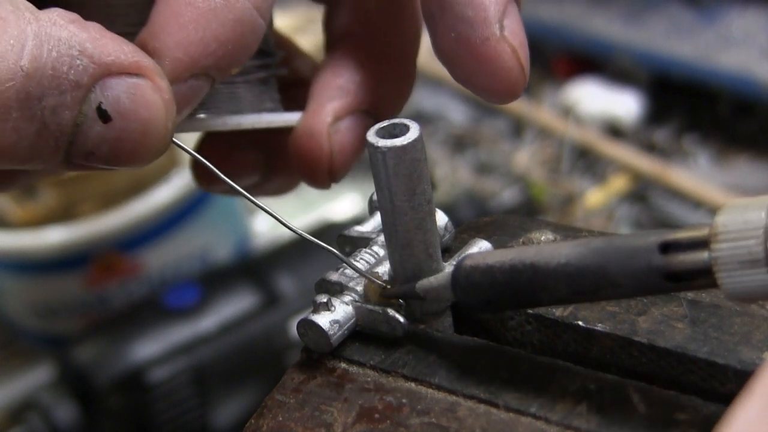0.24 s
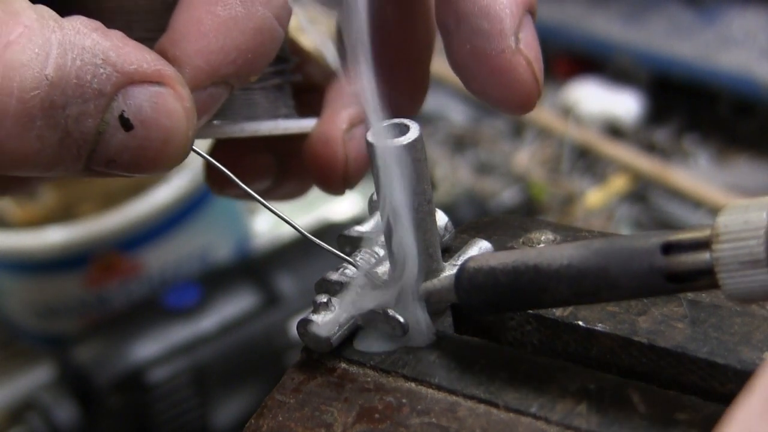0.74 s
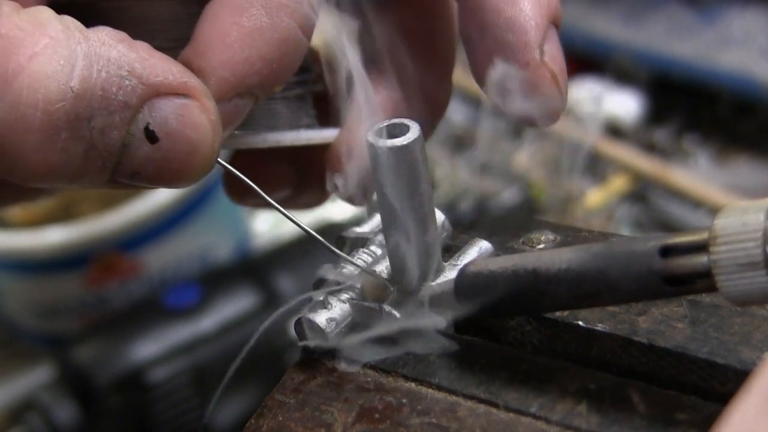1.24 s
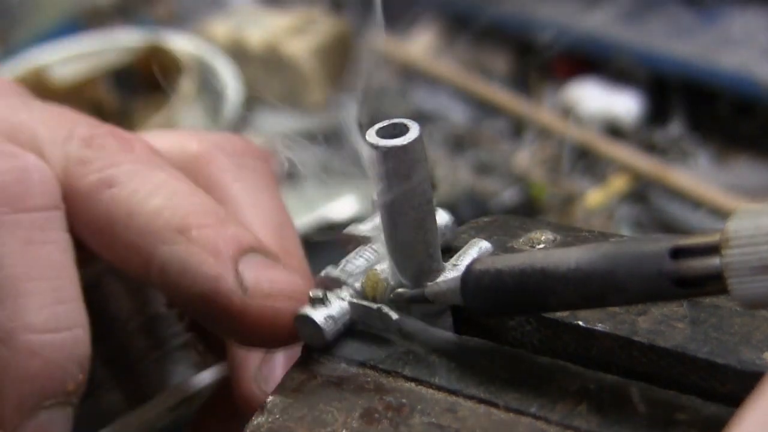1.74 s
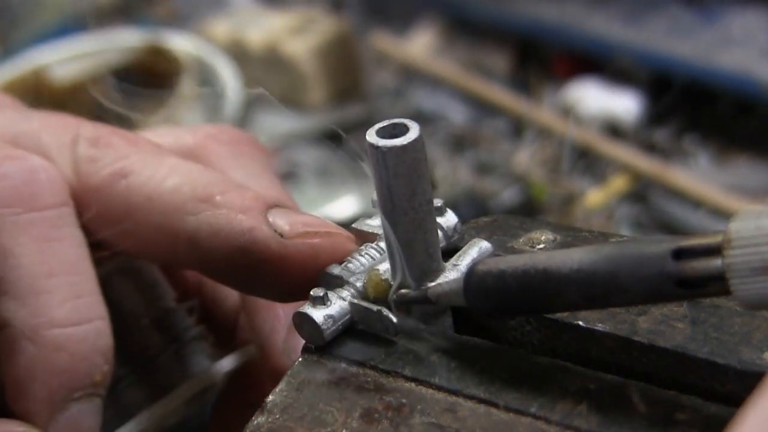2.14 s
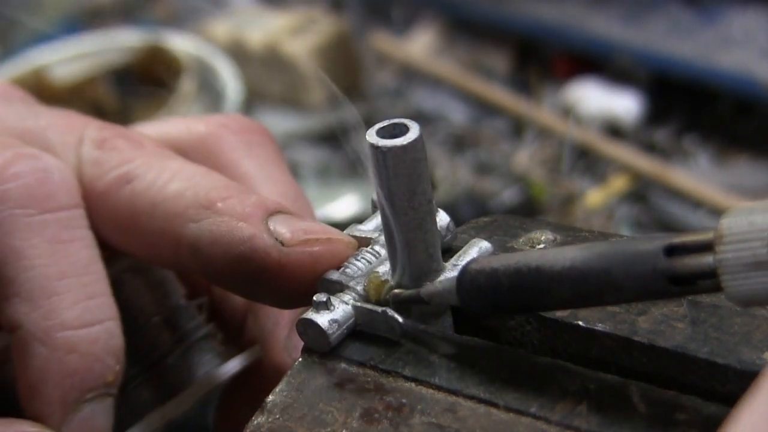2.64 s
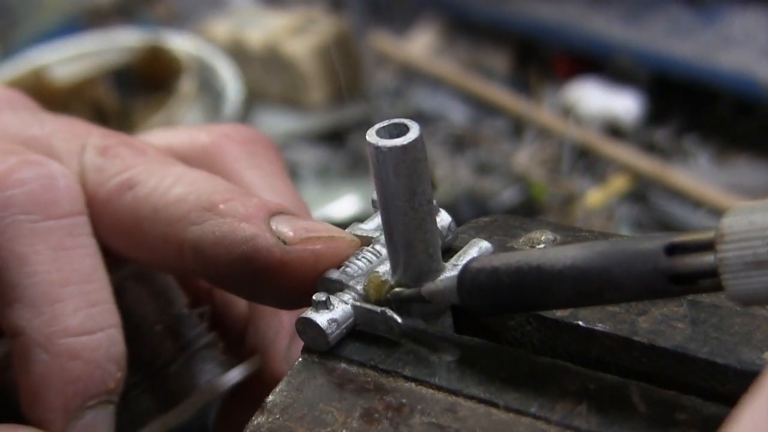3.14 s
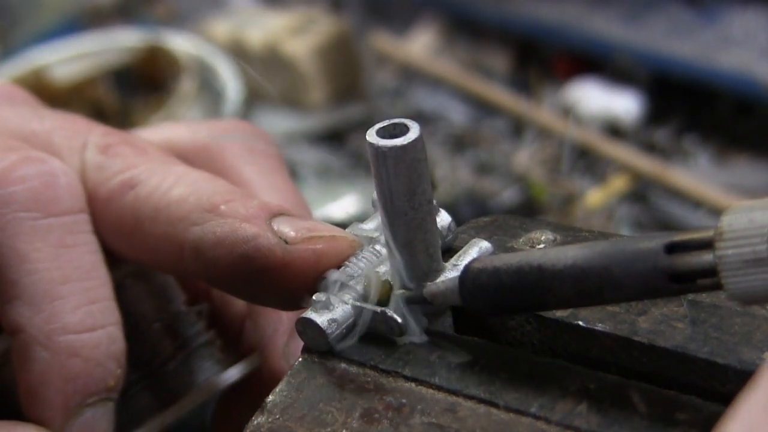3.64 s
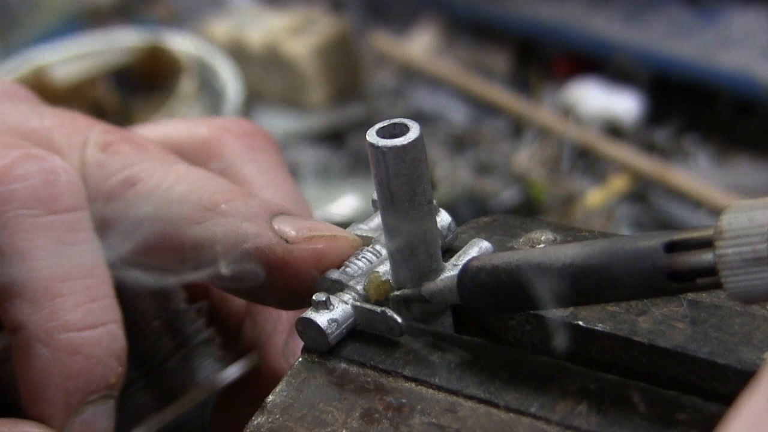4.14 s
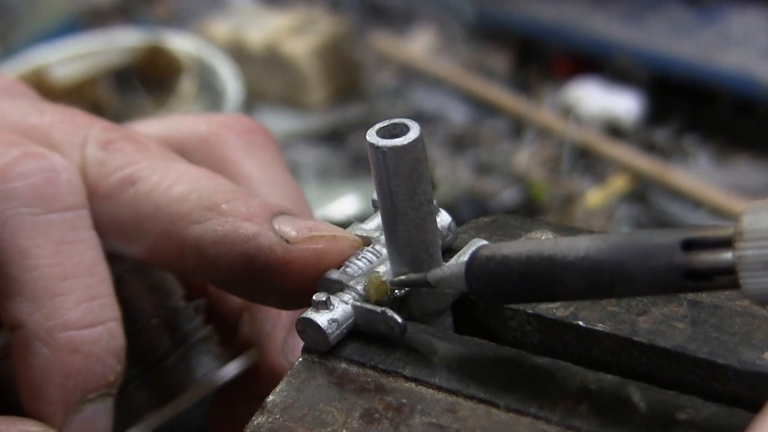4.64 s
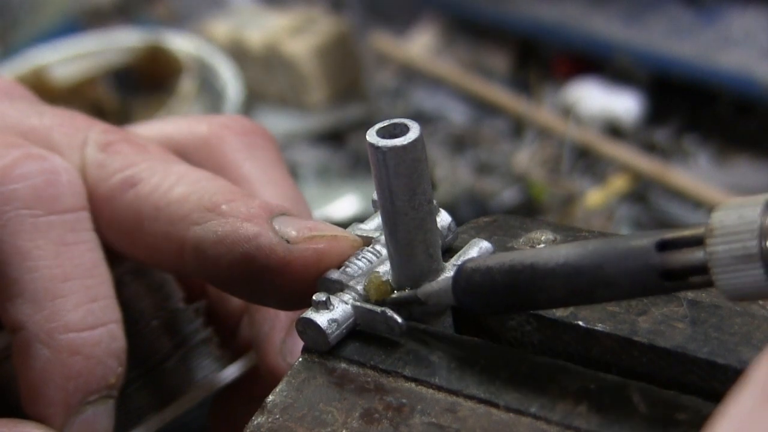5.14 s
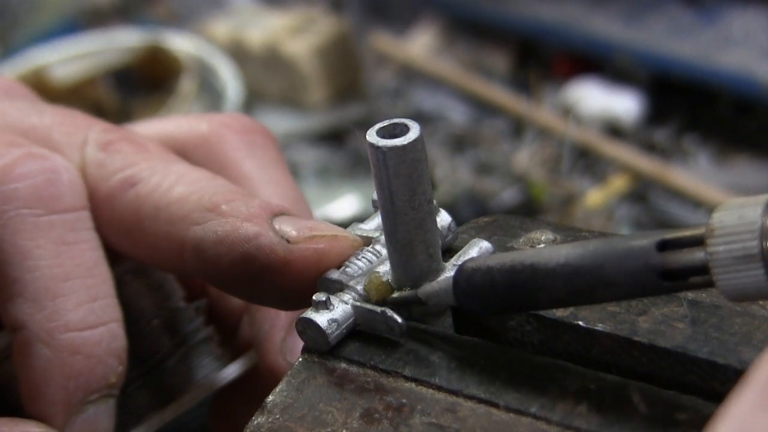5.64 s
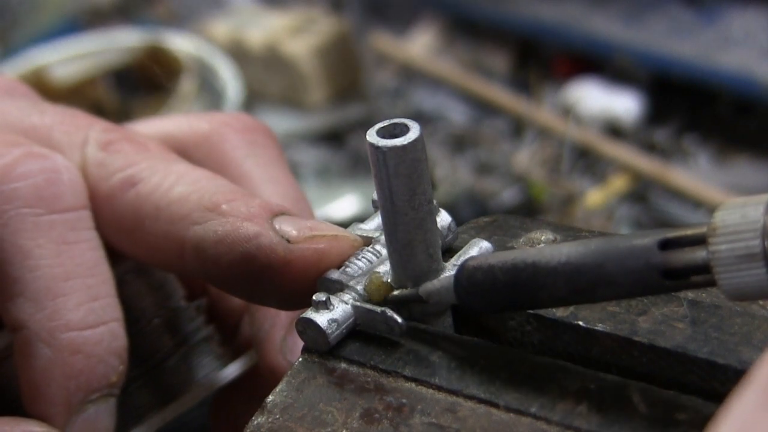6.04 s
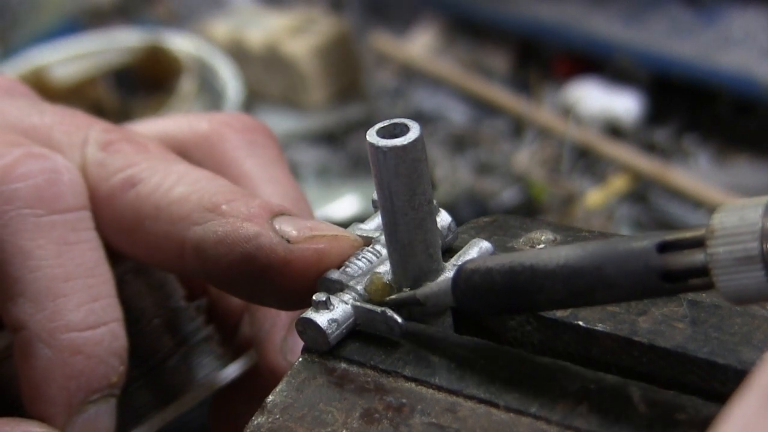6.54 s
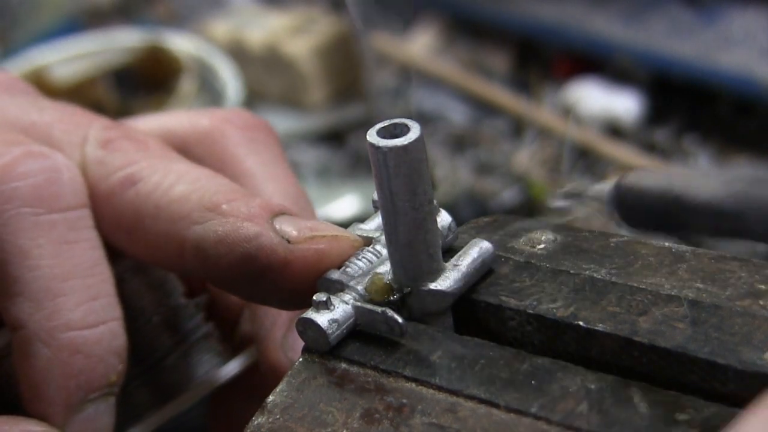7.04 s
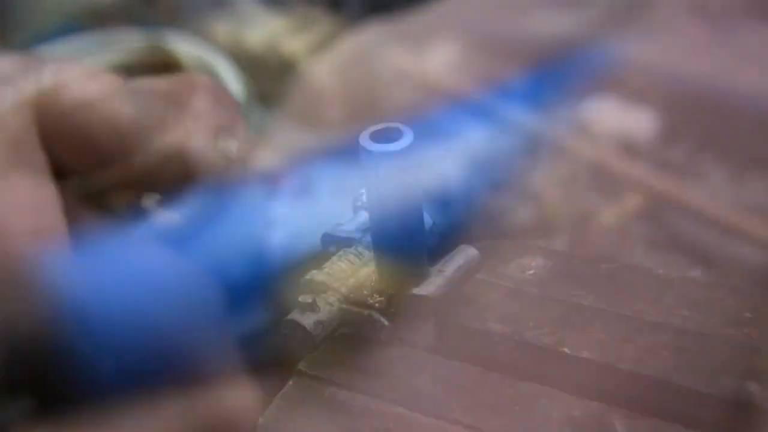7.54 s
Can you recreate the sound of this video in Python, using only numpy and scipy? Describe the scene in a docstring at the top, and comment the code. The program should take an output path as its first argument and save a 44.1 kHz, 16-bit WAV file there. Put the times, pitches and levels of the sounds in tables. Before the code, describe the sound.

A close, dry perspective on soldering at a bench in a quiet workshop, with soft, low droning air throughout. At 0.3 seconds flux begins a fine, dense, bright sizzle, fullest around 0.4 to 0.9, with crisp pops and some low body, growing thinner and finer before cutting off near 1.4. Hands rustle softly and small objects brush between 1.5 and 1.9; tiny high metal ticks appear at 1.7, 2.4 and 3.1. A sharp second fizz starts at 3.4, thinning into loose crackles by 4.3, with a few spits to 4.5. Faint ticks follow. From about 5.0 a sparser, uneven, sputtering crackle runs to 6.7, with a short clattering bench knock at 5.7, slightly right, and a small dull touch near 6.5. A few ticks remain, then skin and sleeve rustle swells around 7.4 and 7.7 with light taps.

```python
"""Soldering a small metal part in a vice, microphone close by, in a quiet workshop with soft, droning air.
First, flux boils on the hot iron in a fine dense sizzle: many tiny bubbles burst, each ringing at its own pitch.
In the pause hands rustle and put the solder aside, and hot metal ticks as its small high modes are set ringing.
A second boil thins out; a third is a sparser, more spitting crackle, with one knock that rings the bench modes.
Last, hands withdraw the iron and reach in again: swelling noise for skin and sleeve, short noises for touches."""
import sys
import numpy as np
from scipy import signal
from scipy.io import wavfile
from scipy.ndimage import uniform_filter1d

SR = 44100
rng = np.random.default_rng(int(sys.argv[2]) if len(sys.argv) > 2 else 0)


def waveform_to_disk(signal):
    """Save audio, clipped to [-1, 1], as 16-bit WAV at the path in sys.argv[1]."""
    frames = np.transpose(np.atleast_2d(signal))
    scaled = np.clip(frames, -1, 1) * 32767
    samples = np.round(scaled).astype(np.int16)
    wavfile.write(sys.argv[1], SR, samples)


N = 342769
TIME = np.arange(N) / SR   # s

# workshop air, a background all round: spectrum (f/Hz, relative density/dB per Hz)
AIR_SPECTRUM = [(25, -2), (45, -7.5), (100, -1), (170, 0), (300, 0.5), (450, -1), (700, -1.5), (900, -5.5),
                (1400, -6), (2200, -9), (5000, -13), (10000, -17.5), (15500, -20.5)]
AIR_DB = -61   # rms, dB
# narrow drones in the air: (f/Hz, width/Hz, rms level/dB)
AIR_DRONES = [(60.5, 9.1, -81), (103, 30, -80), (586, 48, -74), (684.3, 23, -75), (1718, 31, -81)]
# left-right likeness of the diffuse air: (f/Hz, correlation/1)
AIR_LIKENESS = [(30, 1), (100, 0.57), (170, 0.097), (330, -0.44), (700, -0.024), (1200, 0.18), (2500, 0.97),
                (14000, 0.7)]
# left-right likeness of things close by: (f/Hz, correlation/1)
NEAR_LIKENESS = [(200, 1), (1500, 0.69), (6000, 0.6)]
# rustle of skin and sleeve: spectrum (f/Hz, relative density/dB per Hz)
RUSTLE_SPECTRUM = [(40, -26), (150, 2), (400, 5), (1200, -2), (2500, 2), (4500, -6), (10000, -5.5),
                   (16000, -17)]
# hands put the solder aside, withdraw the iron and reach in again: (middle t/s, half length/s, rustle level/dB)
HAND_MOVES = [(1.7, 0.42, -67), (7.38, 0.28, -61.5), (7.71, 0.1, -60.5)]
HANDS_STILL_DB = -75.5   # rustle while they hold still, rms
# light touches of spool, wire and tools: (t/s, level at onset/dB, lowest f/Hz, highest f/Hz, t60/s)
TOUCHES = [(1.561, -56, 2400, 4300, 0.067), (1.668, -55.5, 3600, 5800, .13),
           (1.863, -51, 3800, 7440, 0.041), (6.474, -43, 242, 960, 0.024), (7.620, -57, 1900, 4000, 0.13),
           (7.651, -48.5, 700, 3800, 0.12), (7.652, -53, 9400, 11000, 0.12)]
# hot metal ticking as it expands: (t/s, level/dB)
TICKS = [(1.7125, -45), (2.4154, -44.5), (3.1108, -53), (4.6049, -43), (4.8698, -45.5), (6.7214, -44),
         (6.9077, -45), (7.1067, -54)]
# its small, high modes: (f/Hz, level relative to the tick/dB, t60/s)
TICK_MODES = [(7700, -15, .005), (8750, -22, 0.11), (8970, -2, 0.005), (13850, -19, .14), (14000, -21, .12)]
# the knock on the bench: (t/s, level before left-right balance/dB)
KNOCK = (5.729, -31)
# modes of the bench and what lies on it: (f/Hz, level relative to the knock/dB, t60/s)
BENCH_MODES = [(208.6, -12.5, 0.23), (303, -9, 0.14), (324, -10, 0.077), (402, -26, 0.088), (500, -15, .1),
               (606, -13, 0.16), (633, -3.5, 0.074), (696, -7, 0.23), (727, -6, 0.12), (807, -10.5, 0.25),
               (843, -6, 0.16), (886, -12, 0.18), (1264, 1.5, 0.098), (1484, -8.5, 0.093),
               (1840, -19, 0.26), (2130, -16, 0.24), (2400, -5.5, 0.096), (2765, -8.5, 0.087),
               (2956, -6.5, .07)]
# clatter around the knock: spectrum (f/Hz, relative density/dB per Hz)
CLATTER_SPECTRUM = [(50, -25), (130, -9), (280, 1.5), (450, -11.5), (750, -4), (1400, -1.5), (2000, -6),
                    (3300, -5), (5000, -11), (9000, -9.5), (16000, -42)]
# how long the clatter lasts: (f/Hz, t60/s)
CLATTER_T60 = [(100, 0.47), (700, 0.32), (2000, 0.26), (8000, 0.072)]
# flux meets the hot tip and boils away:
# (start t/s, length/s, relative level/dB, swell/s, die-down/s, first rate/bubbles per s, last rate/bubbles per s)
BOILS = [(0.307, 1.116, -35.5, 0.12, 0.015, 4560, 11400), (3.437, 0.84, -39.5, 0.0084, 0.14, 8400, 770),
         (4.272, 0.23, -49, 0.013, 0.03, 510, 250), (5.074, 1.6, -41.5, 0.18, 0.065, 1200, 600)]
# the boiling waxes and wanes as the iron shifts on the joint: (t/s, level change/dB)
VIGOUR = [(0.45, -2), (0.87, 1), (1.1, -0.5), (1.31, 2.5), (1.41, -3.5), (3.65, 0.5), (4.2, -0.5),
          (5.33, 2), (5.54, 0.5), (5.59, -2), (5.9, 1), (5.98, -5.5), (6.08, 0.5), (6.25, -1), (6.39, 3),
          (6.5, -6.5), (6.59, 3.5)]
# how far below full level a boil starts and ends, and how quick its outer edges are
BOIL_EDGE_DB, BOIL_EDGE_S = 13.5, 0.0013
# a faint simmer lingers: gain relative to full boil, and time to die by 60 dB
SIMMER_DB, SIMMER_T60_S = -28, 0.65
# the largest bubbles spit: (t/s, relative level/dB)
SPITS = [(0.4107, -19.5), (0.5256, -17), (0.5788, -12.5), (0.7424, -14.5), (0.8881, -10.5), (1.1322, -14),
         (4.0912, -14), (4.1271, -25), (4.3021, -15), (4.3695, -12.5), (4.4065, -21), (4.4681, -21.5),
         (5.0027, -35), (5.0405, -30), (5.083, -30), (5.1082, -19.5), (5.1235, -23), (5.1584, -18),
         (5.1927, -13), (5.4137, -16), (5.6592, -17.5), (5.7221, -15), (5.9597, -22), (6.0159, -13.5),
         (6.185, -10.5), (6.3376, -10.5), (6.4552, -21), (6.49, -14), (6.5142, -16.5), (6.5466, -14),
         (6.5666, -11.5), (6.5943, -13), (6.661, -25), (6.6946, -24)]
# resonances and dips that colour every burst: (f/Hz, width/Hz, boost/dB)
BURST_PEAKS = [(1590, 350, -13), (2560, 270, 0.5), (4130, 310, -1), (7100, 200, 3), (9390, 830, 7),
               (11500, 460, -2.5), (11930, 1520, 7), (14100, 340, -1.5), (14700, 880, 2.5)]
# low body that swells with the flux: (f/Hz, width/Hz, relative level/dB)
BURST_BODY = [(370, 200, 11), (1090, 620, 10), (2085, 240, 6.5), (3260, 690, -4), (4950, 620, 2)]
# gain of that low body, strongest while fresh solder is fed in: (t/s, level/dB)
LOW_BODY = [(0.3, -3), (0.42, 3.5), (0.88, 1.5), (0.98, -2.5), (1.4, -5.5), (3.45, -4.5), (4.5, -9),
            (5.3, -7), (5.6, -9), (6.6, -9.5)]
CUTOFF_HZ = 15900   # top of what is heard


def from_db(db):
    """Decibels to amplitude gain."""
    return 10 ** (np.asarray(db) / 20)


def rms_one(x):
    """Scale to unit rms."""
    return x / np.sqrt(np.mean(x ** 2) + 1e-20)


def in_time(rows):
    """Each column of a curve, interpolated at every sample."""
    s, *columns = np.transpose(rows)
    return [np.interp(TIME, s, column) for column in columns]


def at_hz(points, hz):
    """Read a curve over frequency on a log-frequency axis."""
    curve_hz, values = np.array(points).T
    return np.interp(np.log(hz), np.log(curve_hz), values)


def add(track, s, sound):
    """Mix a short sound into a track at time s."""
    i = round(s * SR)
    track[..., i:i + sound.shape[-1]] += sound[..., :N - i]


def clicks(rows):
    """One impulse for each (t/s, level/dB)."""
    out = np.zeros(N)
    for s, db in rows:
        add(out, s, from_db([db]))
    return out


def fade(t, t60):
    """Exponential decay, 60 dB down after t60."""
    return np.exp(-np.log(1000) * t / t60)


def cut(x, hz, kind, order=2):
    """Butterworth low-, high- or band-pass."""
    sos = signal.butter(order, np.clip(hz, 10, .48 * SR), kind, fs=SR, output="sos")
    return signal.sosfilt(sos, x + 1e-18)


def resonance(x, hz, width):
    """Two-pole resonance with gain 1 on top."""
    r = np.exp(-np.pi * width / SR)
    feedforward = np.array([1, 0, -1]) * (1 - r * r) / 2
    feedback = [1, -(1 + r * r) * np.cos(2 * np.pi * hz / SR), r * r]
    return signal.lfilter(feedforward, feedback, x + 1e-18)


def ring(x, hz, t60):
    """A unit click sets a decaying sine of height 1 ringing."""
    r = 1000 ** (-1 / (t60 * SR))
    w = 2 * np.pi * hz / SR
    return signal.lfilter([0, np.sin(w)], [1, -2 * r * np.cos(w), r * r], x + 1e-18)


def coloured_noise(spectrum, likeness, size=N, t60s=None):
    """Stereo noise in half-octave bands, rms 1 at the start; with t60s each band dies at its own pace."""
    edges = 22 * 2 ** np.arange(0, 10, .5)
    white = rng.standard_normal((2, 2, size))
    steady, dying = 0, 0
    for k, (low, high) in enumerate(zip(edges, edges[1:])):
        mid, side = cut(white[k % 2], [low, high], "band")   # neighbouring bands use different noise
        hz = np.sqrt(low * high)
        alike = np.clip(at_hz(likeness, hz), -1, 1)
        stereo = np.sqrt(1 + alike) * mid + np.sqrt(1 - alike) * side * [[1], [-1]]
        band = from_db(at_hz(spectrum, hz)) * stereo
        steady = steady + band
        if t60s is not None:
            dying = dying + band * fade(TIME[:size], at_hz(t60s, hz))
    return (steady if t60s is None else dying) / np.std(steady)


def workshop_air():
    """Steady soft noise all round, with a few droning resonances in the middle."""
    drone = 0
    for hz, width, db in AIR_DRONES:
        drone = drone + from_db(db) * rms_one(resonance(rng.standard_normal(N), hz, width))
    return from_db(AIR_DB) * coloured_noise(AIR_SPECTRUM, AIR_LIKENESS) + drone


def hands():
    """Skin and sleeve rustle, swelling and fading with each move; small things are brushed and tapped."""
    moving = sum(from_db(db) * np.exp(-((TIME - s) / half_s) ** 2) for s, half_s, db in HAND_MOVES)
    rustle_gain = np.hypot(moving, from_db(HANDS_STILL_DB))
    out = rustle_gain * coloured_noise(RUSTLE_SPECTRUM, NEAR_LIKENESS)
    t = TIME[:SR // 5]
    for s, db, low_hz, high_hz, t60 in TOUCHES:
        decay = fade(t, t60)
        touch = cut(decay * rng.standard_normal(len(t)), [low_hz, high_hz], "band", order=4)
        add(out, s, from_db(db) * np.std(decay) * rms_one(touch))
    return out


def ticks():
    """Each slip of the hot metal rings its small, high modes."""
    slips = clicks(TICKS)
    return sum(from_db(db) * ring(slips, hz, t60) for hz, db, t60 in TICK_MODES)


def knock(rise_s=0.00064, hold_s=0.011, ring_db=0.0, clatter_db=-5, chatter_s=0.033, right_db=1.0):
    """A blunt contact drives the bench modes for a moment; they ring out in a short clatter."""
    out, t = np.zeros((2, N)), TIME[:SR // 2]
    s, level_db = KNOCK
    free = t - hold_s * np.tanh(t / hold_s)   # time rung freely since the contact eased
    phases = rng.uniform(0, 2 * np.pi, len(BENCH_MODES))
    modes = 0
    for (hz, db, t60), phase in zip(BENCH_MODES, phases):
        modes = modes + from_db(db) * np.sin(2 * np.pi * hz * t + phase) * fade(free, t60)
    chatter = 1 + np.exp(-(2 * t / chatter_s - 1) ** 2)   # loose things jump and land again
    clatter = chatter * coloured_noise(CLATTER_SPECTRUM, NEAR_LIKENESS, size=len(t), t60s=CLATTER_T60)
    onset = 1 - np.exp(-t / rise_s)
    add(out, s, from_db(level_db) * onset * (from_db(ring_db) * modes + from_db(clatter_db) * clatter))
    return out * from_db([[-right_db], [right_db]])   # stronger on the right


def boil(length_s, level_db, swell_s, die_s, first_per_s, last_per_s, t):
    """Gain and bubble rate of one boil, t seconds after its start: it swells, holds, dies down and simmers."""
    strength = np.clip(t / swell_s, 0, 1) * np.clip((length_s - t) / die_s, 0, 1)
    before_s, after_s = np.clip(-t, 0, 1), np.clip(t - length_s, 0, 1)
    edge = np.exp(-np.minimum((before_s + after_s) / BOIL_EDGE_S, 20))
    gain = from_db(-BOIL_EDGE_DB * (1 - strength)) * edge
    simmer = (t > length_s) * from_db(SIMMER_DB) * fade(after_s, SIMMER_T60_S)
    per_s = first_per_s * (last_per_s / first_per_s) ** np.clip(t / length_s, 0, 1)
    return np.array([from_db(level_db) * np.maximum(gain, simmer), per_s])


def flux_state():
    """Gain and bubble rate of whichever boil is strongest at each moment."""
    states = np.array([boil(*row, TIME - start) for start, *row in BOILS])
    strongest = np.argmax(states[:, 0], axis=0)
    gain, per_s = states[strongest, :, np.arange(N)].T
    return gain * from_db(in_time(VIGOUR)[0]), per_s


def flurries(depth_db=4.0, hz=130):
    """One bursting bubble sets off its neighbours, so the rate surges and lulls; mean 1."""
    surge = from_db(depth_db * rms_one(cut(rng.standard_normal(N), hz, "low")))
    return surge / np.mean(surge)


def bubble_pitches(bursts, low_hz=7500, high_hz=15500, width=1100, ring_db=3, count=12):
    """Each bubble rings for a few cycles at a pitch set by its size class, drawn at random."""
    size_class = rng.integers(0, count, N)
    rings = 0
    for k, hz in enumerate(np.geomspace(low_hz, high_hz, count)):
        rings = rings + resonance(bursts * (size_class == k), hz, width)
    return bursts + from_db(ring_db) * rings


def small_spits(gain, uneven, per_s=60, above_db=17, spread_db=2.8):
    """A thin film of flux also spits at random, in proportion to the boil."""
    born = rng.random(N) < per_s * uneven / SR
    spit_db = above_db + spread_db * np.clip(rng.standard_normal(N), -2, 2)
    return born * gain * from_db(spit_db)


def burst_colour(bursts, body_db, thin_hz=8500):
    """A bursting bubble is a sharp crack, too small to radiate bass, coloured by the metal around it."""
    crack = cut(bursts, thin_hz, "high", order=1)
    for hz, width, boost_db in BURST_PEAKS:   # in series, negative boosts make dips
        crack = crack + (from_db(boost_db) - 1) * resonance(crack, hz, width)
    body = sum(from_db(db) * resonance(crack, hz, width) for hz, width, db in BURST_BODY)
    return crack + from_db(body_db) * body


def sizzle(spread_db=3.0, largest=5.5, steam_db=-14, level_db=-3, spit_db=4,
           lone_per_s=1500, sputter_db=2.15, sputter_hz=16):
    """Countless small bubbles burst at random over a little steam; a few large ones spit."""
    gain, per_s = flux_state()
    body_db, = in_time(LOW_BODY)
    # a thin film of flux bursts in flurries and sputters, a full boil evens them out
    uneven = lone_per_s / (lone_per_s + per_s)
    sputter = from_db(sputter_db * uneven * rms_one(cut(rng.standard_normal(N), sputter_hz, "low")))
    born = rng.random(N) < per_s * (1 + uneven * (flurries() - 1)) / SR
    bursts = born * from_db(spread_db * np.minimum(rng.exponential(1, N), largest))
    bursts = bursts - uniform_filter1d(bursts, size=221)   # no net pressure
    # the heat supplied sets the power, however it is shared among the bubbles
    bursts /= np.sqrt(np.abs(uniform_filter1d(bursts ** 2, size=900)) + .01)
    steam = from_db(steam_db) * rng.standard_normal(N)
    boiling = gain * sputter * (bubble_pitches(bursts) + steam)
    spits = clicks(SPITS) + small_spits(gain, uneven)
    return burst_colour(from_db(level_db) * boiling + from_db(spit_db) * spits, body_db)


def scatter(x, wet_db, t60):
    """Vice and fingers throw back a few milliseconds of weak echoes."""
    t = TIME[:SR // 20]
    tail = rng.standard_normal(len(t)) * fade(t, t60) * (t > .0002)
    tail /= np.sqrt(np.sum(tail ** 2))
    return x + from_db(wet_db) * signal.fftconvolve(x, tail)[:N]


def scene():
    """The work is close and central, so it is nearly dry."""
    work = scatter(sizzle() + ticks(), wet_db=-14.5, t60=0.027)
    return workshop_air() + hands() + knock() + work


def record(dry):
    """The top is cut steeply, alike in both channels."""
    low_pass = signal.firwin(161, CUTOFF_HZ, fs=SR)
    return signal.fftconvolve(dry, low_pass[None], mode="same", axes=-1)


dry = scene()
out = record(dry)
waveform_to_disk(out)
```